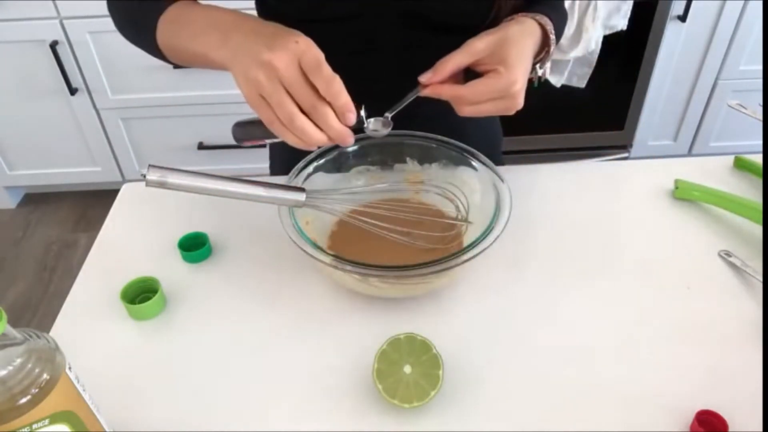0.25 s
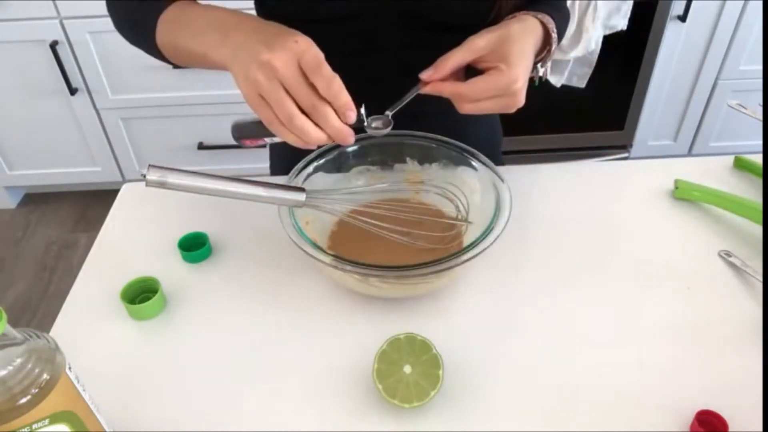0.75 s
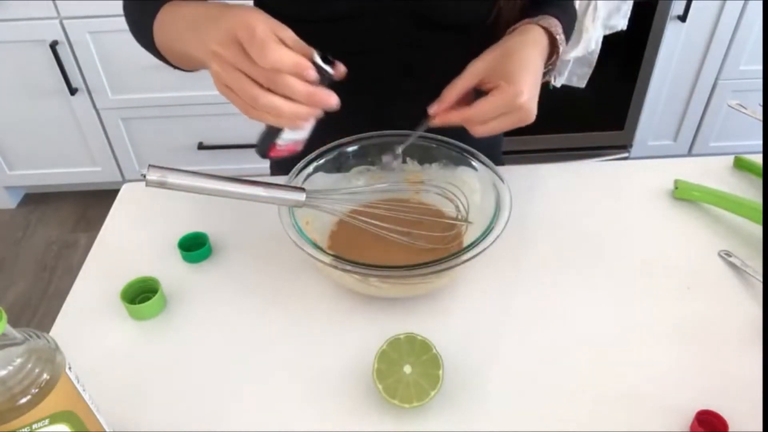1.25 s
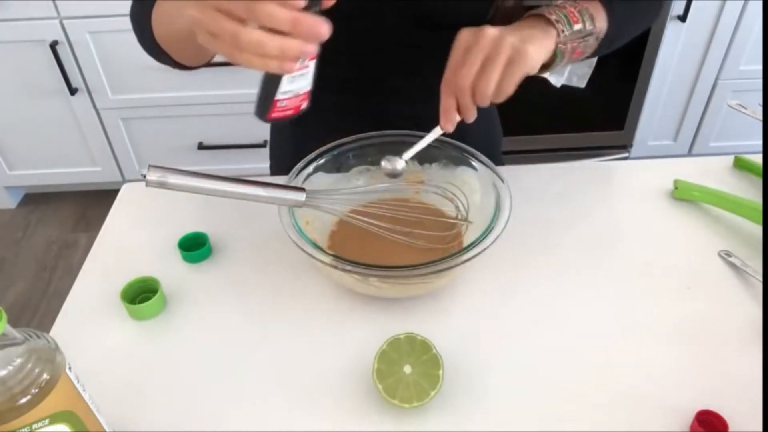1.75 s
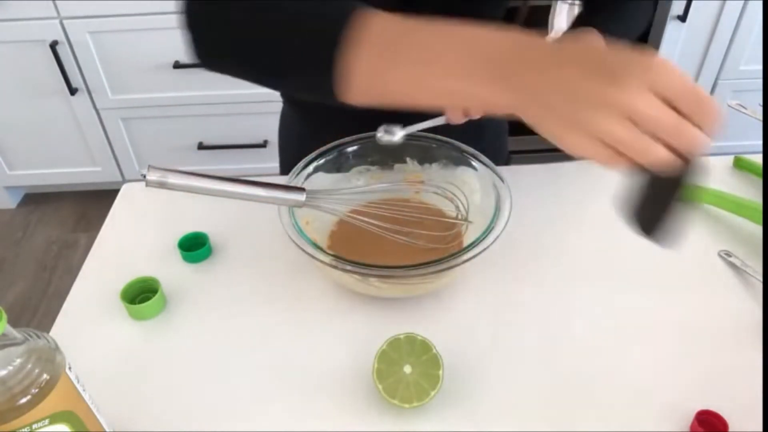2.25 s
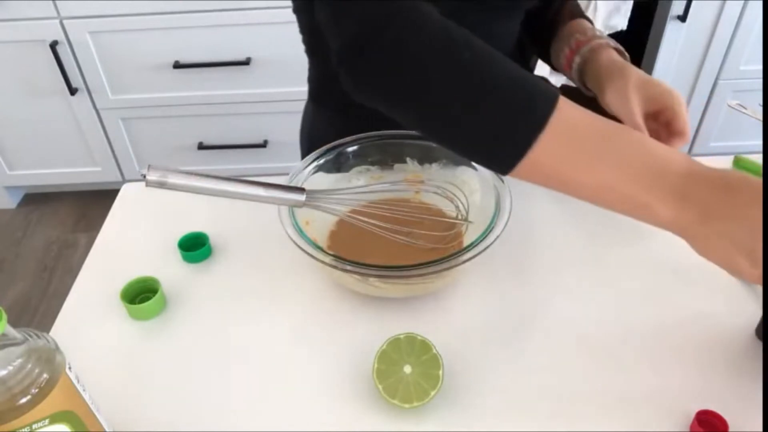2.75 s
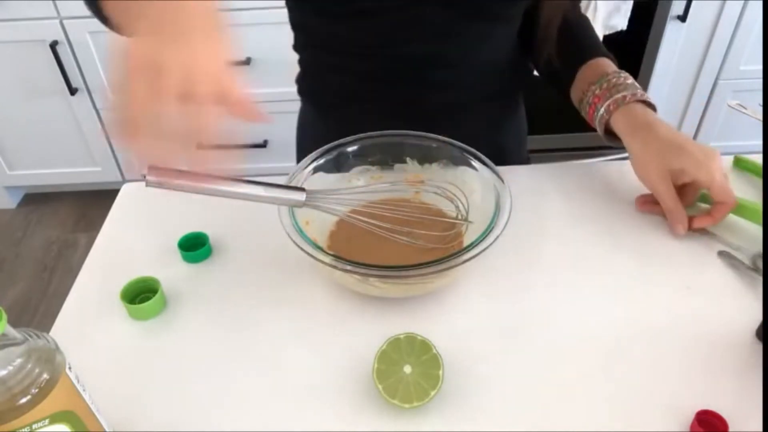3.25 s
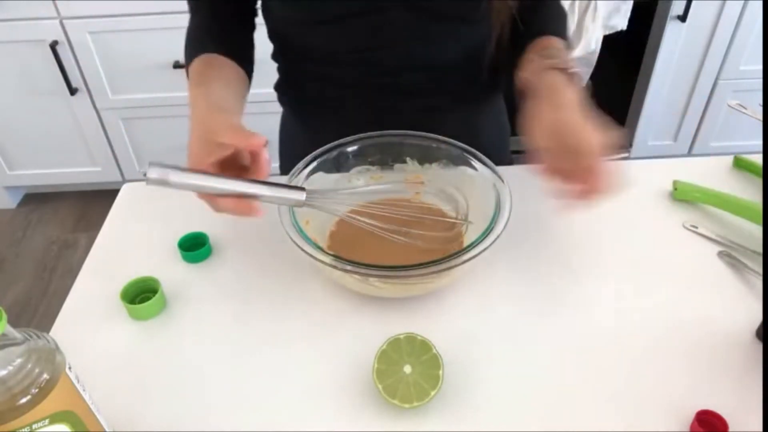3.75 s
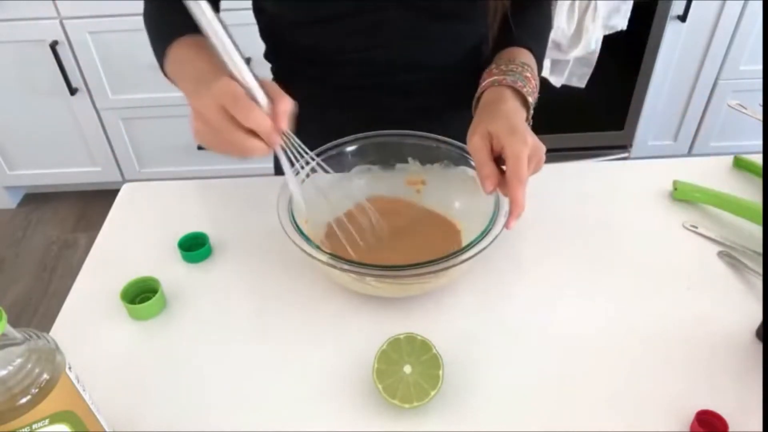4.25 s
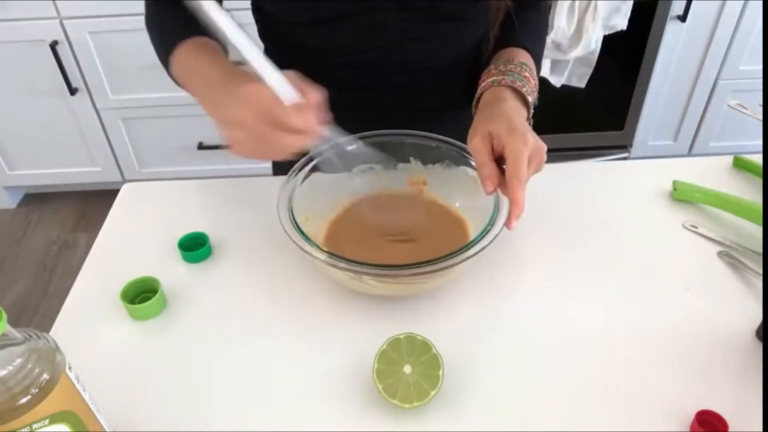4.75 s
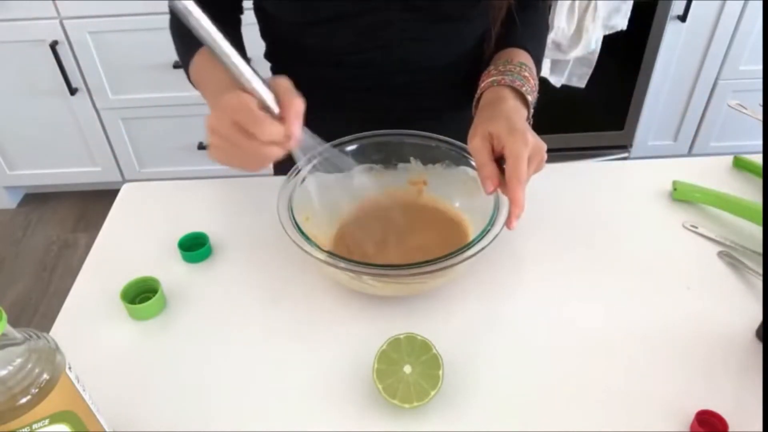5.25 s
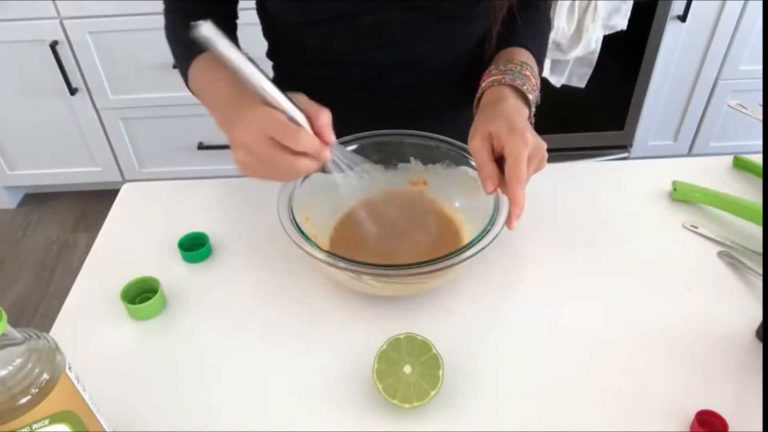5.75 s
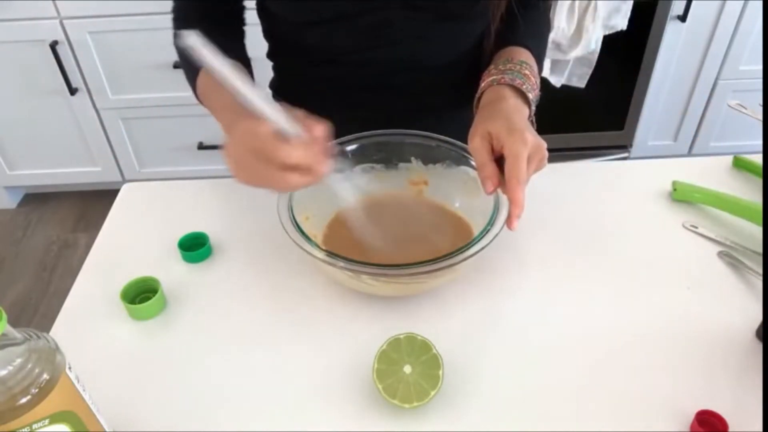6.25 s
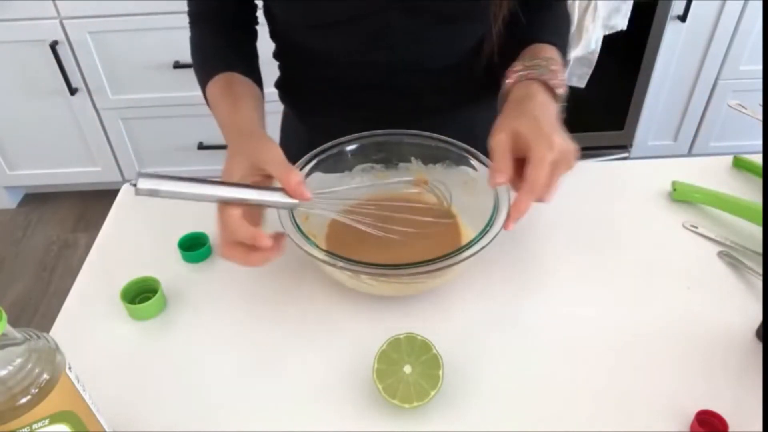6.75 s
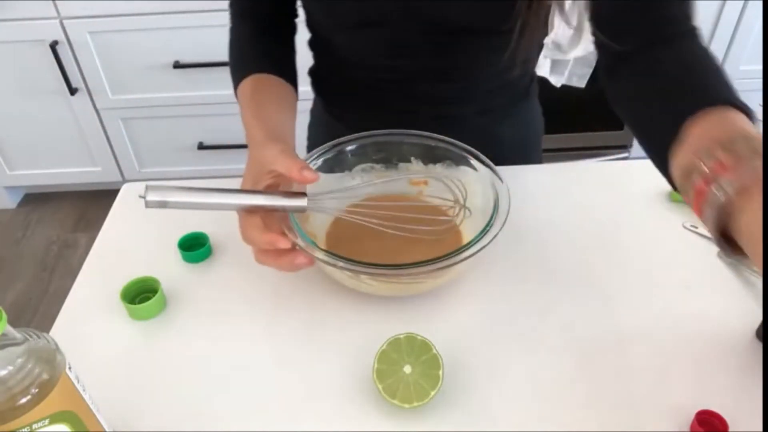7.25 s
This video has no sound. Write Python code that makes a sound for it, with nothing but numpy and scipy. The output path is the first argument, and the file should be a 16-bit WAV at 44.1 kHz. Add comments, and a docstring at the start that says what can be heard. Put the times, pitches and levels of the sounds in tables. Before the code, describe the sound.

Close and detailed, with a short indoor echo and low steady hum: faint knocks, a spoon lightly tapping a whisk, a little wet popping, then blunt bumps on a stone counter. Loose steel spoons land in a sharp, high jangle. A handle thumps, and irregular whisking follows, with damped glass ticks, gritty wire scrapes and small wet pops. The whisk is dropped with one loud glassy clank, then near quiet.

```python
"""Dull knocks over a quiet hum, then a measuring spoon taps a whisk as it is emptied over a glass bowl.
Bottle and steel spoons go down on a stone counter; a whisk stirs thick dressing and drops onto the rim.
Blows set decaying sines ringing and add short noise bursts; bubbles are sines rising in pitch.
Scrapes are crowds of tiny slips. Decaying noise makes the room's echo, and shaped noise its air and hum."""
import sys
import numpy as np
from scipy import signal
from scipy.fft import rfft, irfft
from scipy.io import wavfile

SR = 44100
rng = np.random.default_rng(int(sys.argv[2]) if len(sys.argv) > 2 else 0)


def waveform_to_disk(signal):
    """Save audio, clipped to [-1, 1], as 16-bit WAV at the path in sys.argv[1]."""
    frames = np.transpose(np.atleast_2d(signal))
    scaled = np.clip(frames, -1, 1) * 32767
    samples = np.round(scaled).astype(np.int16)
    wavfile.write(sys.argv[1], SR, samples)


N = 330750   # length in samples

# Low ringing tones of whisk, bowl foot and counter.
# Each row: pitch in Hz, relative level in dB, time to fall by 60 dB in seconds (shortened for scrapes).
BODY = [(226, -26, 0.11), (277.5, -8.5, 0.12), (334, -11, 0.17), (410.6, -8, 0.21), (454.2, -6.5, 0.12),
        (510, -9.5, 0.11), (590, -2.5, 0.1), (657, -4, 0.081), (714, -6, 0.11), (836.5, 3, 0.069),
        (937, -1, 0.07), (1051.6, -2, 0.07), (1357, 9, 0.023), (1580, 5.5, 0.02)]
# Start and end of the stirring, in seconds.
STIRRING = (4.3, 6.8)


def amp(db):
    """Turns decibels into a plain multiplier."""
    return 10 ** (np.asarray(db) / 20)


def rms_one(x):
    """Scales a signal to an average (rms) strength of 1."""
    return x / np.sqrt(np.mean(x ** 2) + 1e-20)


def shaped(x, spectrum):
    """Colours a signal with a curve of (Hz, dB) points."""
    hz, db = np.transpose(spectrum)
    grid = np.maximum(np.arange(N // 2 + 1) * SR / N, 1)
    gain = amp(np.interp(np.log(grid), np.log(hz), db))
    return irfft(rfft(x) * gain, N)


def band(x, low_hz, high_hz):
    """Keeps the sound between two frequencies."""
    return signal.sosfilt(signal.butter(2, [low_hz, high_hz], "band", fs=SR, output="sos"), x)


def low_pass(x, cutoff_hz):
    """Softens everything above the cutoff."""
    return signal.sosfilt(signal.butter(2, cutoff_hz, fs=SR, output="sos"), x)


def clicks(times, gains):
    """Places one-sample clicks at the given times."""
    out = np.full(N, 1e-18)   # tiny offset instead of exact silence
    np.add.at(out, np.round(np.asarray(times) * SR).astype(int), gains)
    return out


def ring(x, hz, t60):
    """A resonator: a click of height 1 starts a sine of height 1 that falls by 60 dB in t60 seconds."""
    decay = amp(-60 / (t60 * SR))
    turn = 2 * np.pi * hz / SR
    return signal.lfilter([0, np.sin(turn)], [1, -2 * decay * np.cos(turn), decay * decay], x)


def strike(times, level_db, modes, spread_db, focus_hz=None, focus_db=0):
    """Every blow lands on another spot, so each tone (mode) gets its own strength and sign."""
    hz, db, t60 = np.transpose(modes)
    chance = rng.standard_normal((len(times), len(modes), 2))
    levels = np.add.outer(level_db, db) + spread_db * chance[..., 0]
    if focus_hz is not None:
        octaves_away = abs(np.log2(np.divide.outer(focus_hz, hz)))
        levels -= focus_db * octaves_away   # tones far from the focus are weaker
    gains = amp(levels) * np.sign(chance[..., 1])
    return sum(ring(clicks(times, gains[:, k]), hz[k], t60[k]) for k in range(len(hz)))


def tick(times, level_db, centres_hz, t60, octaves, rise_s):
    """The crack of contact: a short noise burst reaching some octaves either side of its centre."""
    out, t = np.zeros(N), np.arange(SR // 5) / SR
    shape = amp(-60 * t / t60) * np.minimum(t / rise_s, 1)
    noises = rng.standard_normal((len(times), len(t)))
    for s, db, hz, noise in zip(times, level_db, centres_hz, noises):
        burst = band(noise, hz / 2 ** octaves, min(hz * 2 ** octaves, 18000))
        i = round(s * SR)
        out[i:i + len(t)] += amp(db) * shape * rms_one(burst)
    return out


def clink(times, level_db, cycles, skid_s, count, tilt_db):
    """Thin steel skids for a moment: short tones, new at every touch, set off one after another."""
    out, t = np.zeros(N), np.arange(SR // 8) / SR
    chance = rng.random((len(times), 3, count, 1))
    for s, db, (where, size, late) in zip(times, level_db, chance):
        hz = 3200 * 4.14 ** where
        age = np.maximum(t - skid_s * late, 0)   # seconds since each tone was set off
        tone_db = -12 * size - 17.7 * late + tilt_db * np.log2(hz / 4000)
        tones = amp(tone_db - 60 * age * hz / cycles) * np.sin(2 * np.pi * hz * age)
        i = round(s * SR)
        out[i:i + len(t)] += amp(db) * tones.sum(axis=0)
    return out


def contact(times, level_db):
    """Steel on glass or steel: a crack and a skid."""
    crack = tick(times, level_db - 11.5, np.full(len(times), 6500), 0.039, octaves=0.62, rise_s=0.0013)
    return crack + clink(times, level_db - 8.5, cycles=71, skid_s=0.03, count=40, tilt_db=-9)


def glass(times, low_db, high_db, damping, spread_db):
    """The bowl rings in a low and a high family of tones; damping divides their decay times."""
    # Ringing tones of the glass bowl, a low and a high table.
    # Each row: pitch in Hz, relative level in dB, time to fall by 60 dB in seconds before damping.
    low_tones = [(1976, 0, .2), (2030, -10, .25), (2105, -17, .2)]
    high_tones = [(3545, -7, .12), (3600, -6, .22), (3650, -7, .18), (5556, -7, .13), (5590, -9, .11),
                  (7730, -17, .16), (8048, -16, .08), (8742, -21, .12), (9695, -18, .16), (11530, -20, .1),
                  (12890, -18, .06)]
    out = 0
    for db, tones in [(low_db, low_tones), (high_db, high_tones)]:
        out = out + strike(times, db + 1.5, np.array(tones) / [1, 1, damping], spread_db)
    return out


def thump(times, level_db, centres_hz, focus_db):
    """A blunt thing lands in three quick contacts: low tones near the centre ring over a dull puff."""
    landing_s, blunt_hz = 0.00638, 2520   # the contacts fall within this time; blunt blows lack treble
    puff = tick(times, level_db + 4.5, centres_hz, 0.057, octaves=0.45, rise_s=0.0058)
    contacts = (times[:, None] + landing_s * rng.random((len(times), 3))).ravel()
    tones = strike(contacts, np.repeat(level_db - 4.5, 3), BODY, 1.8, np.repeat(centres_hz, 3), focus_db)
    return low_pass(puff + tones, blunt_hz)


def dressing_taps():
    """Whisk taps through the dressing ring the glass only briefly and set the wire loops going."""
    # Taps of the whisk. Each row: start in seconds, sharpness in dB, weight in dB,
    # pitch near which the body is strongest in Hz.
    taps = [(4.5132, -50, -54, 930), (4.6053, -35.5, -59.5, 1390), (4.7293, -39, -56, 1480),
            (4.7712, -38.5, -51.5, 537), (4.8315, -46, -52, 950), (4.856, -52, -50, 280),
            (4.862, -60, -62, 718), (4.8858, -48, -59, 280), (4.9102, -35.5, -60, 264),
            (5.0524, -35.5, -53.5, 543), (5.0644, -37, -50, 536), (5.168, -46, -68, 280),
            (5.22, -44, -53.5, 550), (5.34, -53, -53.5, 280), (5.414, -56, -58, 498),
            (5.5134, -33.5, -51, 900), (5.5796, -40.5, -53.5, 1530), (5.5905, -42, -52, 1020),
            (5.811, -58, -53.5, 1380), (5.899, -57, -57, 486), (5.9832, -34.5, -57, 1580),
            (6.0684, -49, -63.5, 1330), (6.1192, -69, -53.5, 495), (6.4612, -49.5, -54, 350),
            (6.561, -39, -49.5, 490)]
    # Wire loops of the whisk. Each row: middle pitch in Hz, relative level in dB,
    # time to fall by 60 dB in seconds.
    wires = [(280, 2.5, 0.38), (503, 6, 0.14), (718, -1, .1), (979, 9, 0.11), (1480, 14, 0.043),
             (2740, 5, 0.045)]
    wire_wander = 0.034   # clinging dressing shifts the wires' pitch by this share, down or up
    s, sharp_db, weight_db, body_hz = np.transpose(taps)
    # low glass tones follow the weight of a tap, high ones its sharpness
    out = glass(s, weight_db - 8, sharp_db - 12, damping=6.0, spread_db=4.0)
    loads = rng.integers(0, 3, len(s))   # one of three pitch shifts per tap
    for load in range(3):
        these = loads == load
        loaded = np.array(wires) * [1 + wire_wander * (load - 1), 1, 1]
        out += strike(s[these] + 0.00414, weight_db[these] - 0.5, loaded, spread_db=0.0,
                      focus_hz=body_hz[these], focus_db=6.5)
    out += tick(s, weight_db - 0.5, body_hz, 0.096, octaves=1.0, rise_s=0.0017)
    return out + contact(s, sharp_db)


def rim_hits():
    """Bare steel on the glass clinks, rings the bowl freely and thumps."""
    # Each row: start in seconds, clink level in dB, low glass level in dB, high glass level in dB,
    # body level in dB, pitch near which the body is strongest in Hz. All levels are relative.
    hits = [(4.4054, -26.5, -51, -33, -53.5, 1440), (4.4174, -47, -69, -44, -56, 880),
            (4.4624, -40, -50, -40.5, -50.5, 1460), (6.8885, -25.5, -23, -26, -25.5, 806)]
    s, clink_db, low_db, high_db, body_db, body_hz = np.transpose(hits)
    out = glass(s, low_db, high_db, damping=1.6, spread_db=2.0)
    out += thump(s, body_db + 3.0, body_hz, focus_db=4.5)
    return out + contact(s, clink_db)


def scrape(per_s, size_db, cycles):
    """Steel dragged over glass or stone: clumps of tiny slips, each ringing briefly and shaking the body."""
    # Drags. Each row: start in seconds, time held in seconds, scrape level in dB, low part in dB.
    drags = [(1.6, 0.14, -66, -61.5), (2.8, 0.11, -72, -61.5), (2.918, 0.0033, -54, -60),
             (3.03, 0.02, -93, -56.5), (3.211, 0.0032, -58, -49.5), (3.41, 0.073, -65.5, -67),
             (3.506, 0.066, -46.5, -49.5), (3.63, 0.2, -67, -62), (3.778, 0.065, -55.5, -56.5),
             (4.031, 0.21, -72.5, -82), (4.422, 0.006, -51, -49), (4.746, 0.0035, -56, -50),
             (4.859, 0.0043, -58.5, -53.5), (5.02, 0.045, -60, -63), (5.2, 0.026, -66.5, -66),
             (5.4, 0.017, -65, -57.5), (5.796, 0.0058, -60.5, -56), (6.0, 0.24, -72, -72),
             (6.469, 0.18, -67, -58.5)]
    # Tone colour of the scrape. Each row: frequency in Hz, relative strength in dB.
    grit_colour = [(710, -70), (1200, 8.5), (1470, -0.5), (2530, 2.5), (3550, 6), (4000, 10), (5350, 10.5),
                   (11100, -1.5), (16000, 5)]
    bite_db_per_s, fade_db_per_s = 600, 173   # every drag swells fast and fades slower
    clumps = amp(5 * rms_one(band(rng.standard_normal(N), 8, 40)))
    happens = rng.random(N) < per_s * clumps / SR
    slips = happens * amp(size_db * np.minimum(rng.exponential(1, N), 4))
    slips = slips * rng.choice([-1, 1], N) + 1e-18
    # each slip is dealt one of 16 pitches
    pitches, dealt = np.geomspace(1400, 14000, 16), rng.integers(0, 16, N)
    grains = sum(ring(slips * (dealt == k) + 1e-18, hz, cycles / hz) for k, hz in enumerate(pitches))
    grit = rms_one(shaped(rms_one(grains) + 0.34 * rng.standard_normal(N), grit_colour))
    low = rms_one(sum(amp(db) * ring(slips, hz, 0.2 * t60) for hz, db, t60 in BODY))
    t, out = np.arange(N) / SR, 0
    for s, held_s, grit_db, low_db in drags:
        swell_db = -bite_db_per_s * np.maximum(s - t, 0)
        fade_db = -fade_db_per_s * np.maximum(t - s - held_s, 0)
        out = out + amp(swell_db + fade_db) * (amp(grit_db) * grit + amp(low_db) * low)
    return out


def pops():
    """A bursting bubble: a few cycles rising in pitch inside a puff; faint ones have no puff."""
    # Wet pops. Each row: start in seconds, relative level in dB, starting pitch in Hz.
    loud = [(1.714, -36.5, 835), (1.737, -52, 2330), (1.8177, -41.5, 1366), (1.878, -42.5, 2100),
            (4.389, -43, 1480), (4.4385, -37, 1435), (4.703, -36, 1610), (4.937, -43.5, 1465),
            (5.442, -44, 1540), (6.0215, -42.5, 1563), (6.2, -46, 1414), (6.233, -47.5, 1146),
            (6.445, -47, 1390)]
    faint_count, faint_db, faint_hz = 90, -64, 1000   # quietest level and middle pitch
    pop_cycles = 50   # at the starting pitch, until 60 dB down
    out, t = np.zeros(N), np.arange(SR // 8) / SR
    when, size, pitch = rng.random((faint_count, 3)).T
    faint_s = STIRRING[0] + when * np.ptp(STIRRING)
    faint = zip(faint_s, faint_db + 12 * size, faint_hz * 2 ** (3.4 * pitch - 1.7))
    for s, level_db, hz in [*loud, *faint]:
        i = round(s * SR)
        phase = 2 * np.pi * hz * t * (1 + 6.3 * t)
        shape = amp(level_db - 60 * t * hz / pop_cycles) * np.minimum(t / 0.0011, 1)
        out[i:i + len(t)] += shape * np.sin(phase)
    s, level_db, hz = np.transpose(loud)
    return out + tick(s, level_db - 4.0, hz, 0.014, octaves=0.75, rise_s=0.0016)


def snaps():
    """Bright films snap as short noise bursts, with fainter ones scattered through the stirring."""
    # The loudest snaps. Each row: start in seconds, relative level in dB, centre in Hz.
    loud = [(1.7147, -36, 4400), (1.7267, -49, 4490), (1.7594, -59, 5400), (1.8377, -49.5, 5400),
            (1.966, -43, 4450), (4.269, -57.5, 8500), (4.337, -53, 5630), (4.375, -47, 5700),
            (4.6399, -57, 4430), (4.701, -42, 4500), (4.974, -54, 4270), (5.032, -59, 4580),
            (5.316, -55, 10300), (5.4946, -44, 5450), (5.697, -48, 4300), (5.7144, -47, 4230),
            (5.751, -43, 4500), (5.794, -45.5, 4700), (5.8636, -49, 4960), (6.133, -56, 5160),
            (6.1674, -47, 4210), (6.3776, -52.5, 4720), (6.5201, -44.5, 4300), (6.6683, -48, 4300),
            (7.1076, -46, 4520)]
    faint_count, faint_db, faint_hz = 24, -56, 5000   # quietest level and middle pitch
    s, level_db, hz = np.transpose(loud)
    out = tick(s, level_db - 6, hz, 0.029, octaves=0.48, rise_s=0.0026)
    when, size, pitch = rng.random((faint_count, 3)).T
    faint_s = STIRRING[0] + when * np.ptp(STIRRING)
    centres_hz = faint_hz * 2 ** (1.6 * pitch - 0.8)
    return out + tick(faint_s, faint_db + 10 * size, centres_hz, 0.0062, octaves=1.0, rise_s=0.00072)


def spoons():
    """Jostling spoons: each touch ticks, clinks, chatters and rings them until the next moment of rest."""
    # Touches. Each row: start in seconds, tick level in dB, ringing level in dB, both relative.
    jingle = [(2.7918, -59, -46.5), (2.802, -56, -36), (2.9046, -40.5, -33.5), (2.934, -61, -44),
              (3.1977, -26.5, -30), (3.2073, -66, -57), (3.467, -46, -40.5), (3.493, -12, -21.5),
              (3.523, -28.5, -27), (3.6233, -38, -34), (3.7187, -30.5, -31.5), (3.753, -34, -25),
              (3.7853, -28, -32.5), (3.7947, -22, -32), (3.8258, -43, -29.5)]
    # Six sets of ringing tones: the first spoon held two ways, the second, third and fourth spoon, their ring.
    # Each row: pitch in Hz, relative level in dB, time to fall by 60 dB in seconds.
    spoon_tones = [
        [(5324, -9, .1), (9475, -4, .25), (11320, 0, .12), (13860, -8, .09)],
        [(5230, -9, .1), (6013, 0, .1), (9195, -9, .15), (11280, -2, .15), (13700, -2, .16), (13880, -3, .16)],
        [(3655, -7, .25), (8489, 0, .5), (11930, -6, .15), (14160, -14, .25)],
        [(11575, 0, .13), (11935, -1, .13), (13120, -9, .15), (14165, -9, .15)],
        [(6745, 0, .18), (7660, -5, .15), (9850, -8, .25)],
        [(4334, -2, .24), (4441, -6, .22)],
    ]
    # Times in seconds between six phases: the bunch touches, is set down, nudged, dropped, rocks,
    # is gathered up.
    regrip_s = (2.88, 3.1, 3.3, 3.51, 3.7)
    # What hangs free, one row per phase: level in dB of each of the six sets, in the order above.
    free_db = [(-1.5, -30, -42.5, -40, -29.5, -6), (-29, 3, -42.5, -40, -38, -2),
               (-5.5, -22, -29.5, -10, -36.5, -24.5), (-27, -24, 8.5, -2, -2, 5),
               (-27.5, -27, -9.5, -20, -1, 2), (-31, -28, -11, 6.5, 3, 1)]
    # Moments in seconds at which fingers or stone mute the spoons.
    rests_s = (3.67, 3.87)
    rest_db_per_s = 300
    chatter_s, chatter_db = 0.035, -5.5   # three lighter touches follow each one within this time
    s, tick_db, ring_db = np.transpose(jingle)
    phase = np.searchsorted(regrip_s, s)
    levels = np.repeat(ring_db + np.transpose(free_db)[:, phase], 4, axis=1)
    later = np.tile([0, 1, 1, 1], len(s))   # 0 for the touch itself, 1 for its chatter
    touches = np.repeat(s, 4) + chatter_s * later * rng.random(len(later))
    levels = levels + chatter_db * later
    until = np.repeat(np.searchsorted(rests_s, s), 4)   # which rest ends the ringing
    rings = 0
    for k, rest_s in enumerate(rests_s):
        now = until == k
        free = sum(strike(touches[now], db[now] - 17.0, tones, spread_db=4.0)
                   for db, tones in zip(levels, spoon_tones))
        rings = rings + free * amp(-rest_db_per_s * np.maximum(np.arange(N) / SR - rest_s, 0))
    crack = tick(s, tick_db + 3.5, np.full(len(s), 4800), 0.0089, octaves=1.6, rise_s=0.002)
    skid = clink(s, tick_db - 19.5, cycles=90, skid_s=0.07, count=200, tilt_db=-5.0)
    return rings + crack + skid


def knocks():
    """Blunt blows of bottle and whisk handle: a thump, with a tick where the edge is hard."""
    # Each row: start in seconds, thump level in dB, pitch near which it is strongest in Hz,
    # tick level in dB. Levels are relative.
    blows = [(0.102, -38.5, 1230, -50.5), (0.185, -48, 1200, -56.5), (1.966, -37.5, 1380, -45),
             (2.792, -44.5, 810, -38), (2.862, -33.5, 354, -43.5), (2.894, -39.5, 820, -38.5),
             (3.019, -35, 400, -40.5), (3.032, -36, 490, -46), (3.973, -26.5, 870, -42),
             (4.067, -32.5, 690, -64), (4.117, -33, 854, -70)]
    s, level_db, hz, tick_db = np.transpose(blows)
    edge = tick(s, tick_db, np.full(len(s), 3000), 0.018, octaves=0.8, rise_s=0.0014)
    return thump(s, level_db - 5.5, hz, focus_db=9) + band(edge, 800, 6010)


def spoon_taps():
    """The measuring spoon knocks the resting whisk, steel on steel: a clink and a few lasting tones."""
    # Each row: start in seconds, clink level in dB, low ring in dB, high ring in dB, all relative.
    taps = [(1.5574, -38, -60.5, -51.5), (1.6008, -37.5, -48.5, -51), (1.6896, -43, -59, -49.5)]
    # What rings then, a low and a high set.
    # Each row: pitch in Hz, relative level in dB, time to fall by 60 dB in seconds.
    tapped_tones = [
        [(618, -1, 0.11), (715, 0.5, 0.28), (1390, -2, 0.095), (2070, 3, 0.12)],
        [(3600, -14, 0.3), (3640, -5.5, 0.25), (3710, -1.5, 0.092), (5670, -18, 0.17)],
    ]
    s, clink_db, *levels = np.transpose(taps)
    rings = sum(strike(s, db, tones, spread_db=4.0) for db, tones in zip(levels, tapped_tones))
    return contact(s, clink_db) + rings


def room(x):
    """Echo of the kitchen: decaying noise whose treble dies first."""
    t60_s, level_db, dull_hz = 0.82, -11.5, 3630
    t = np.arange(SR) / SR
    noise = rng.standard_normal((2, SR))
    dull = low_pass(noise[0], dull_hz) * amp(-60 * t / t60_s)
    bright = 1.26 * noise[1] * amp(-60 * t / (0.34 * t60_s))
    tail = (dull + bright) * np.clip((t - 0.003) / 0.0014, 0, 1)   # first reflections take a few ms
    return amp(level_db) * signal.fftconvolve(x, tail / np.sqrt(np.sum(tail ** 2)))[:N]


def air():
    """Steady room noise, with the hum and whine of appliances as noise-driven, wavering resonances."""
    # Tone colour of the air. Each row: frequency in Hz, relative strength in dB.
    air_colour = [(13, -95), (22, -42), (48, -40), (81, -29.5), (110, -2), (281, -6), (381, -11),
                  (593, -9.5), (663, -16), (805, -11.5), (1480, -23.5), (5440, -35), (6600, -38.5),
                  (15100, -43.5), (16500, -62)]
    # Hum and whine of appliances. Each row: pitch in Hz, width in Hz, average (rms) level in dB.
    hum = [(62.5, 2.5, -73.5), (119.8, 7, -72.5), (155.4, 2.3, -70.5), (281.7, 7.5, -71.5),
           (6640, 330, -83)]
    out = amp(-61) * rms_one(shaped(rng.standard_normal(N), air_colour))
    for hz, width_hz, db in hum:
        t60 = np.log(1000) / np.pi / width_hz   # a narrow line rings for longer
        out = out + amp(db) * rms_one(ring(rng.standard_normal(N), hz, t60))
    return out


def scene():
    """All contacts share the room; small objects radiate no deep bass."""
    near = dressing_taps() + rim_hits() + scrape(per_s=1500, size_db=3.0, cycles=34.0)
    near = near + pops() + snaps() + spoons() + knocks() + spoon_taps()
    near = signal.sosfilt(signal.butter(2, 170, "high", fs=SR, output="sos"), near)
    return (near + room(near) + air())[None]


def record(dry):
    """A steep filter cuts the top: from 16600 Hz up the sound is at least 60 dB down."""
    return signal.sosfilt(signal.cheby2(12, 60, 16600, fs=SR, output="sos"), dry)


dry = scene()
out = record(dry)
waveform_to_disk(out)
```